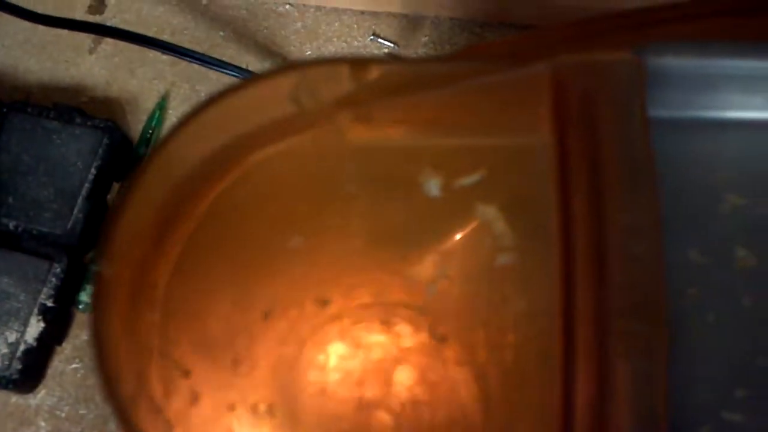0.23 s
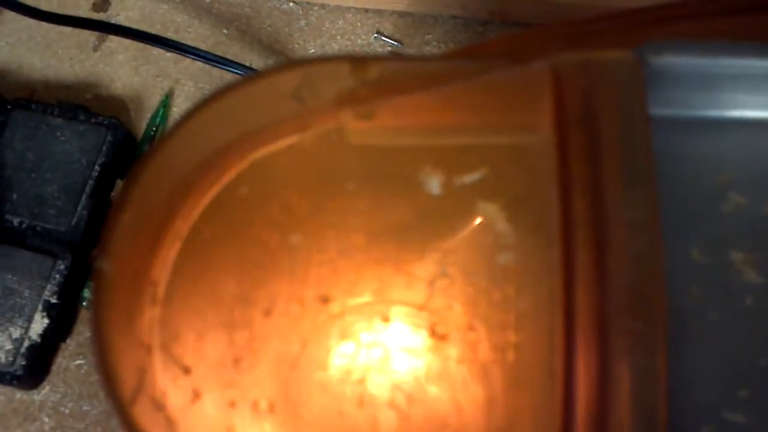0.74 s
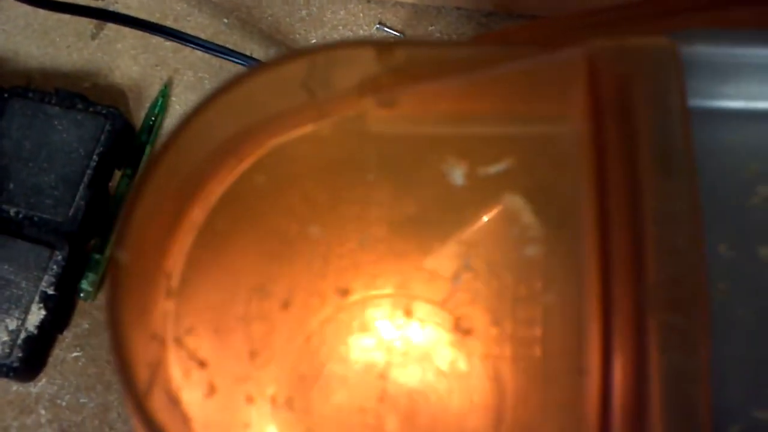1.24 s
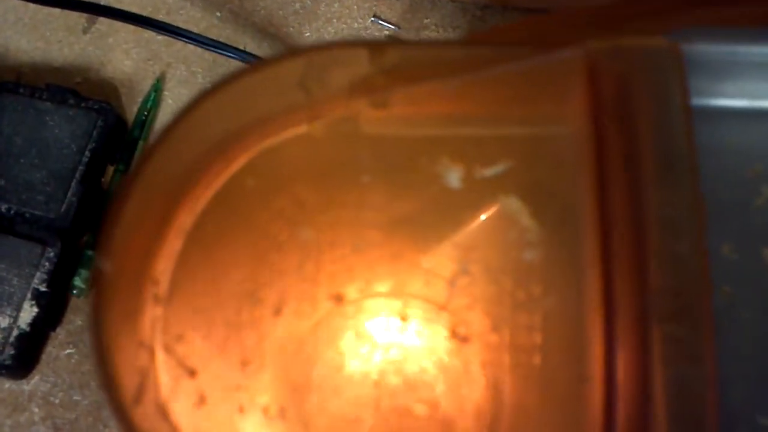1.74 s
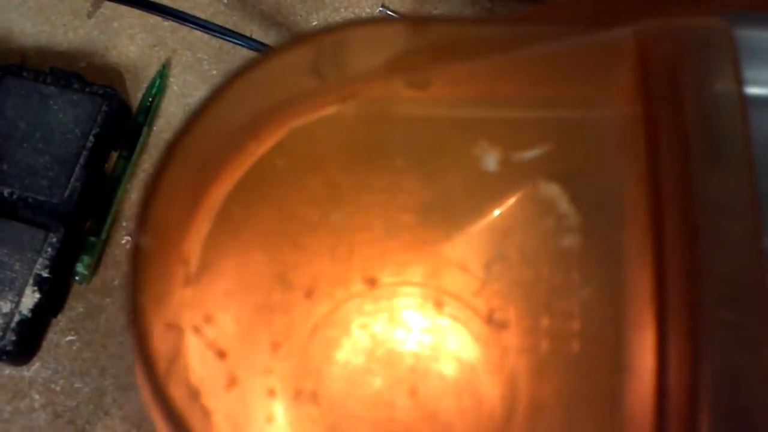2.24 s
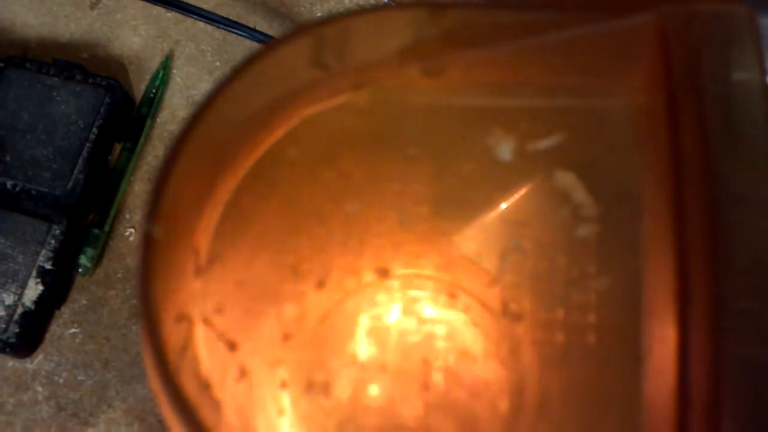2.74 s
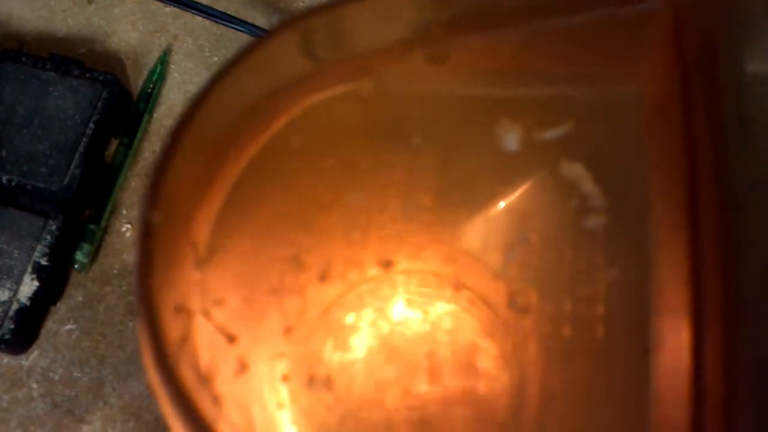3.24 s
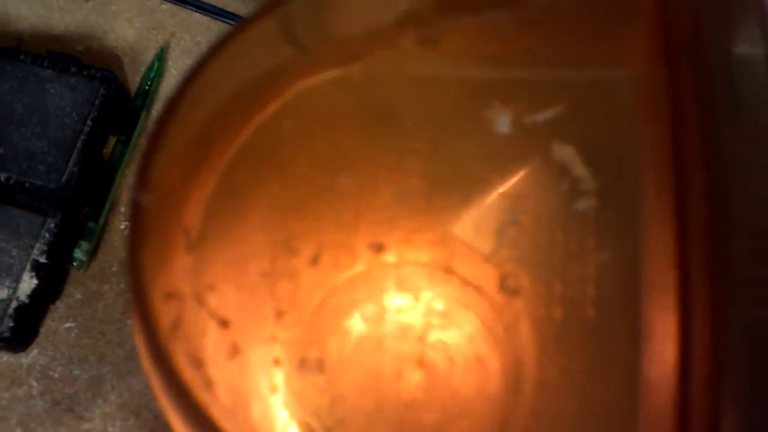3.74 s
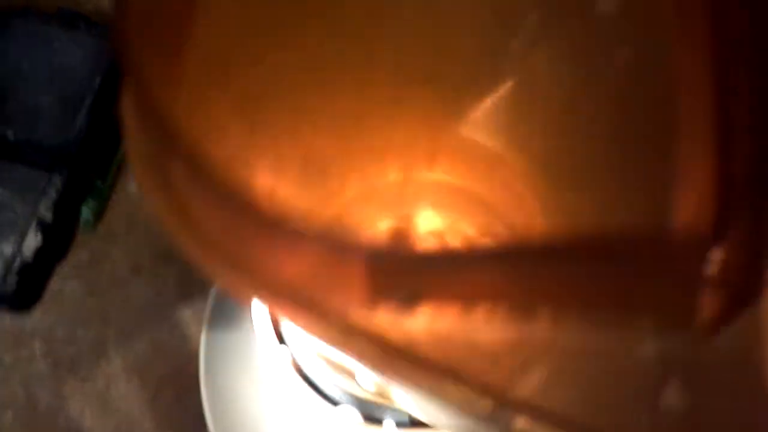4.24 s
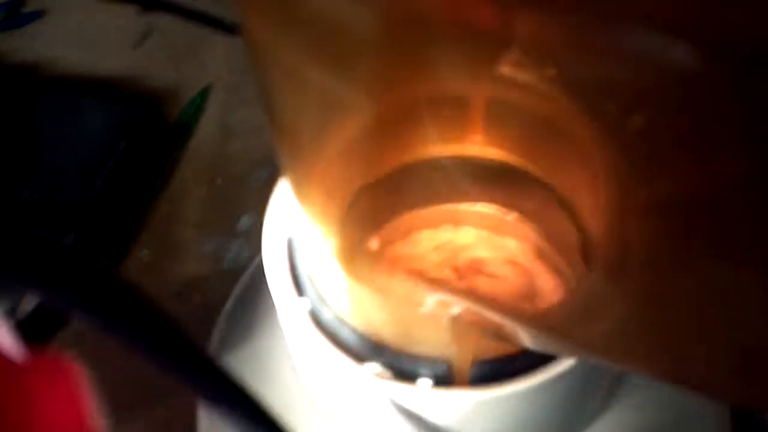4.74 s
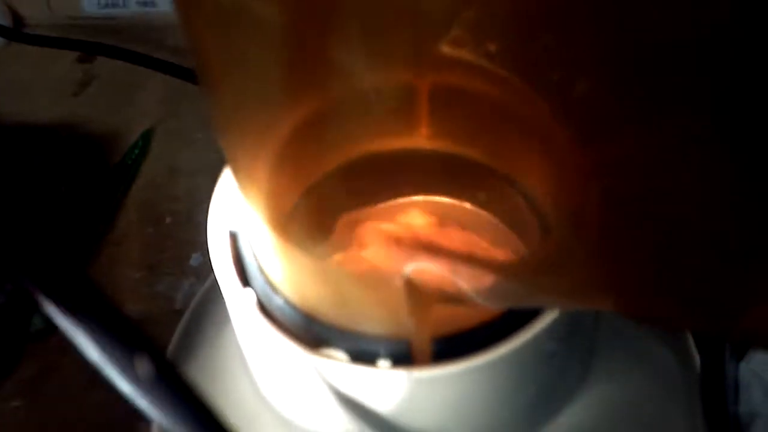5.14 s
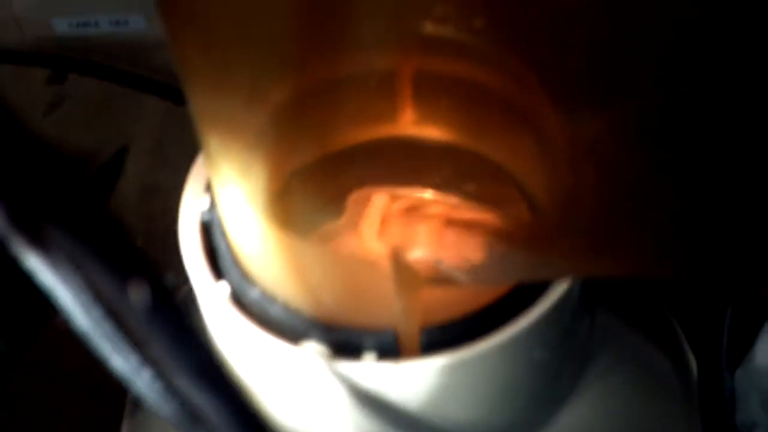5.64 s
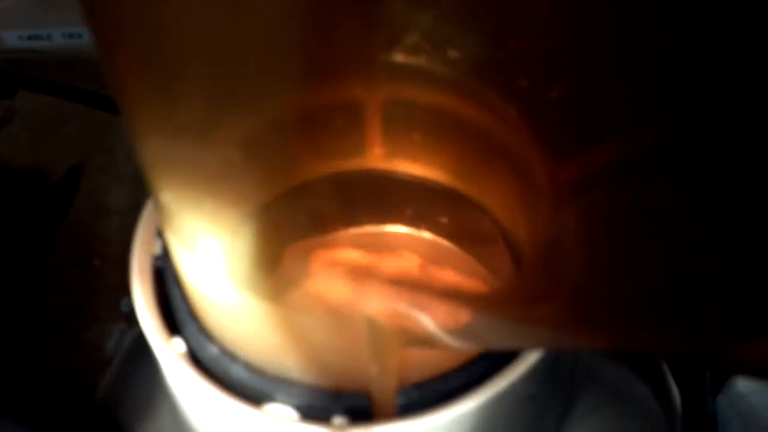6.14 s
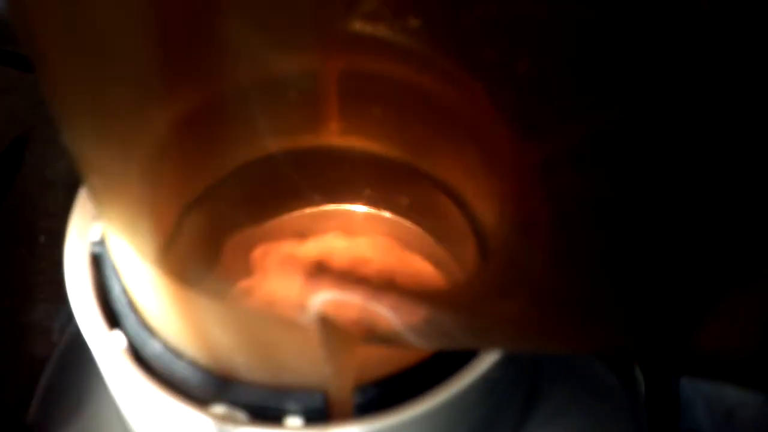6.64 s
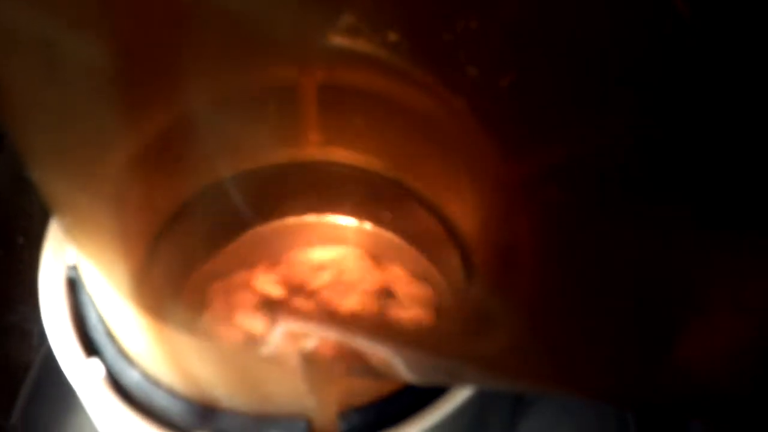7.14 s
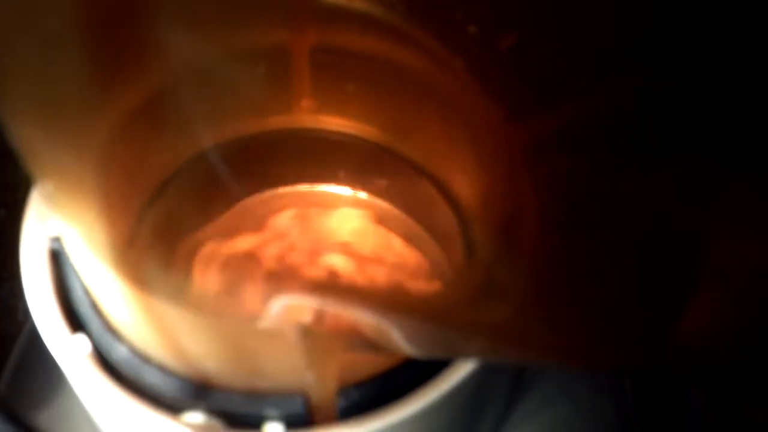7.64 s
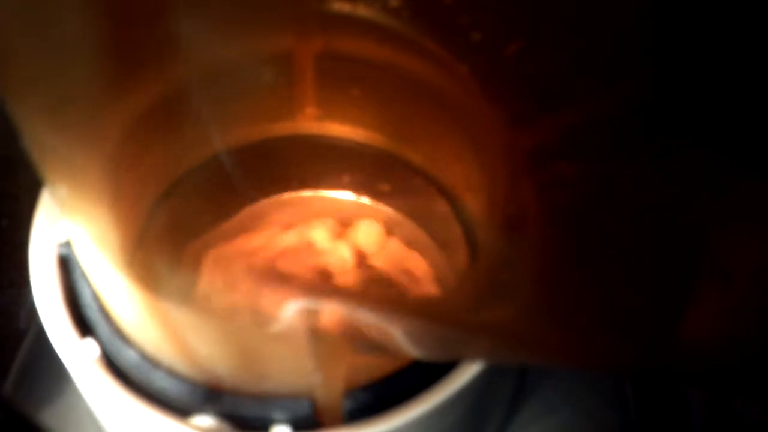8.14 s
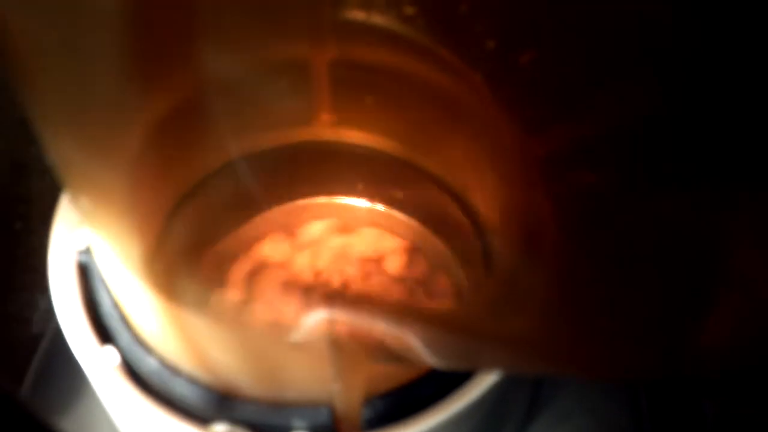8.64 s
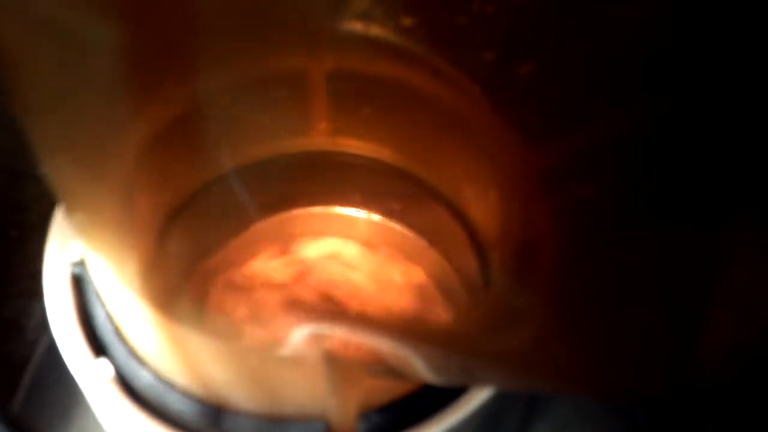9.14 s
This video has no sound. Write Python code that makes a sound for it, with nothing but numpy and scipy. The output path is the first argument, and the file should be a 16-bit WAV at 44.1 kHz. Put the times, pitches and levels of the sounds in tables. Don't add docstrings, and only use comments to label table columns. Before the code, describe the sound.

A hot-air popper roars steadily as coffee beans tumble and tick inside, its motor whining, with a strong low hum arriving as the listener moves to the spout.

```python
import sys
import numpy as np
from scipy import signal
from scipy.fft import rfft, irfft, next_fast_len
from scipy.io import wavfile
from scipy.ndimage import uniform_filter1d

SR = 44100
rng = np.random.default_rng(int(sys.argv[2]) if len(sys.argv) > 2 else 0)


def ratio(d):
    e = np.asarray(d, float) / 20
    return 10 ** e


def wav_record(signal):
    frames = np.transpose(np.atleast_2d(signal))
    bounded = np.clip(frames, -1, 1)
    quanta = np.round(bounded * 32767).astype(np.int16)
    wavfile.write(sys.argv[1], SR, quanta)


N = 414981
SIZE = next_fast_len(N)
HZ = np.arange(SIZE // 2 + 1) * SR / SIZE + 1
SECONDS = np.arange(N) / SR
COARSE = 64


def curve(table):
    s, *columns = np.transpose(table)
    return [np.interp(SECONDS, s, column) for column in columns]


def across(table):
    hz, *columns = np.transpose(table)
    return [np.interp(np.log(HZ), np.log(hz), column) for column in columns]


def bump(hz, width_hz):
    return np.exp(-.5 * ((HZ - hz) / width_hz) ** 2)


def fine(coarse):
    return np.interp(np.arange(N) / COARSE, np.arange(len(coarse)), coarse)


def walk(rate):
    k = max(int(SR / rate / COARSE), 1)
    knots = rng.standard_normal(N // COARSE // k + 3)
    steps = np.interp(np.arange(N // COARSE + 2), np.arange(len(knots)) * k, knots)
    return 1.26 * uniform_filter1d(steps, k)


def self_noise():
    level_db = -74
    rumble = signal.lfilter([1], [1, -.99], rng.standard_normal((2, N)))
    return rumble * ratio(level_db) / np.std(rumble)


def shade_db():
    # start_s, depth_db, clears_s
    shade = [
        (0, -1.5, 1.75),
        (4.45, -1.5, 0.95),
    ]
    total_db = np.zeros(N)
    for start_s, depth_db, clears_s in shade:
        t = SECONDS - start_s
        onset = np.clip(t / 0.11 + 1, 0, 1)
        total_db += depth_db * onset * np.exp(-(np.maximum(t, 0) / clears_s) ** 2)
    return total_db


def turbulence(tumble_db, flicker_db):
    spectrum = rfft(rng.standard_normal(SIZE))
    octave = np.clip(np.log2(HZ / 100), 0, 7.5)
    out = np.zeros(N)
    for centre in np.arange(0, 8, .5):
        share = np.clip(1 - np.abs(octave - centre) * 2, 0, 1)
        treble = np.clip((centre - 4.2) / 2.0, 0, 1)
        db = treble * tumble_db + flicker_db * (0.46 + treble) * walk(9)
        out += fine(ratio(db)) * irfft(spectrum * share, SIZE)[:N]
    return out


def beans(tumble_db):
    beans_per_s, level_db, scatter_db = 1500, -6, 6
    hits = rng.random(N) < beans_per_s / SR
    hardness = np.minimum(rng.exponential(size=N), 3.5)
    ticks = hits * ratio(scatter_db * hardness + fine(tumble_db)) * rng.choice([-1., 1.], N)
    shell = np.exp(-np.arange(128) / 22) * rng.standard_normal(128)
    highpass = signal.butter(2, 3200, "high", fs=SR, output="sos")
    ticks = signal.sosfilt(highpass, np.convolve(ticks, shell)[:N])
    return ratio(level_db) * ticks / np.std(ticks)


def rim_ring(noise):
    level_db, passes_s, hold_s = -53, 4.53, .23
    rise_db_per_s, fall_db_per_s = 105, 260
    t = SECONDS - passes_s
    db = level_db - rise_db_per_s * np.maximum(-t - hold_s, 0) - fall_db_per_s * np.maximum(t, 0)
    ring = irfft(noise * bump(1870, 70), SIZE)[:N]
    return ratio(db) * ring * np.array([[1], [-1]])


def roar(place, roar_db, hiss_db):
    # pitch_hz, above_db_per_hz, spout_db_per_hz
    chamber_air = [(60.4, -84, -81), (207, -57.5, -55), (308, -51.5, -49.5), (426, -45, -47.5),
                   (546.7, -38, -38.5), (602.5, -46, -51), (684, -55, -50.5), (790, -60.5, -49),
                   (1044, -61.5, -57), (1300, -64.5, -58), (1413, -60, -61.5), (1702, -51, -55.5),
                   (1909, -51, -65.5), (2124, -77.5, -69.5)]
    # pitch_hz, above_db_per_hz, spout_db_per_hz
    slot_jets = [(2500, -66, -73), (2800, -66, -69), (3200, -71, -65), (3600, -70, -69), (4300, -71, -69),
                 (5000, -75, -75), (6000, -68, -66), (7000, -71, -70), (8500, -74, -74), (10000, -76, -74),
                 (11700, -75, -72), (12600, -78, -77), (14000, -82, -80), (15600, -88, -84)]
    # pitch_hz, width_hz, above_db, spout_db
    hood_echoes = [(370, 22, 4, 3), (688, 25, 5.5, 1.5), (838, 31, 1, 2), (1070, 140, 1, -1.2),
                   (1460, 47, -3, 4), (1233, 23, 5, -3), (1360, 38, -3.5, 1), (1278, 31, 3, -4),
                   (1820, 78, -2, 3.5), (2010, 40, 5, 4), (2430, 45, 5, -3), (2760, 57, -5.5, -14),
                   (3085, 57, 0.5, -5), (3065, 100, -1.5, 5.5), (4100, 160, -0.5, -6), (4400, 160, 0, 5),
                   (5370, 210, -7, -7), (5880, 140, 1, 3), (7660, 190, -4, -0.5), (9230, 300, -3, -2),
                   (13000, 300, -6, -2.5)]
    # pitch_hz, side_minus_mid_db, phase_rad, likeness_0_to_1
    ports_above = [(30, -24, 1.5, .2), (90, -3, 2.5, .3), (200, -25, 2, .8), (400, -20.5, 2, 0.95),
                   (540, -16, 2, 1), (800, -10.5, 2.5, 0.8), (1100, 0, 2, .7), (1500, 0, 5.5, .6),
                   (1700, -5.5, 2, 1), (2050, 6, 3, 0.9), (2500, 13.5, 1.6, .3), (2940, -0.7, -0.5, .4),
                   (5200, -0.6, -0.5, 0.6), (16000, -0.5, 1.5, .5)]
    # pitch_hz, side_minus_mid_db, phase_rad, likeness_0_to_1
    ports_spout = [(30, -24, -4, .2), (90, -6, 2.5, .3), (300, -17, 2, .4), (470, -8, 2.04, 0.89),
                   (600, -12, 2.5, 0.93), (750, -17, 5, .8), (1000, -3.5, 4, 0.87), (1500, -1, 1.5, 0.96),
                   (1700, 2, 3, 0.81), (1900, 5, 2, .5), (2440, 8.5, 3, .3), (2930, 1.8, 0, 0.54),
                   (5200, 0.9, 0, 0.66), (16000, 0, -1, .5)]
    tumble_db = 1.08 * walk(4.1) + 0.85 * walk(20)
    near = rfft(turbulence(tumble_db, 0.46) + beans(tumble_db), SIZE) * np.sqrt(SR / 2)
    other = rfft(turbulence(tumble_db, 0.69) + beans(tumble_db), SIZE) * np.sqrt(SR / 2)
    low = np.clip((2500 - HZ) / 300, 0, 1)
    out = rim_ring(near)
    for k, (ports, share) in enumerate(zip((ports_above, ports_spout), (1 - place, place))):
        side_db, phase, like = across(ports)
        like = np.clip(like, 0, 1)
        echo_db = sum(row[2 + k] * bump(*row[:2]) for row in hood_echoes)
        colour_db = across(chamber_air + slot_jets)[k] + echo_db
        side = ratio(side_db) * (like * np.exp(1j * phase) * near + np.sqrt(1 - like ** 2) * other)
        pair = np.array([near, side]) * ratio(colour_db - side_db * (1 - low))
        body = irfft(pair * low, SIZE)[:, :N]
        jets = irfft(pair * (1 - low), SIZE)[:, :N]
        out = out + share * (body * ratio(roar_db) + jets * ratio(hiss_db))
    return out


def whine_levels():
    # shaft_order, above_db, spout_db
    usual_lines = [(9, -58, -57), (18, -54, -55), (22, -68, -63), (25, -68, -64), (29, -54, -53),
                   (52, -54, -52), (56, -62, -61), (62, -56, -57), (68, -61, -58)]
    # shaft_order, above_db, spout_db
    singers = [(9, -48, -51), (14, -49, -48), (16, -53, -50), (17, -51, -61), (18, -45, -48),
               (19, -46, -44), (26, -57, -52), (30, -52, -54), (32, -55, -48), (34, -44, -46),
               (35, -48, -48), (37, -55, -49), (38, -45, -55), (39, -51, -48), (41, -51, -42),
               (44, -58, -47), (46, -53, -47), (50, -49, -50), (52, -50, -52)]
    scatter_db = 2
    order, *usual = np.transpose(usual_lines)
    orders = np.arange(order[0], order[-1] + 1)
    rows = np.transpose([np.interp(orders, order, u) for u in usual])
    rows = rows + scatter_db * rng.standard_normal((len(orders), 2))
    for k, *db in singers:
        rows[round(k - order[0])] = db
    return round(order[0]), rows


def whine(place, turn):
    coarse_place = np.append(place[::COARSE], [1, 1])[:N // COARSE + 2]
    shaded_db = np.append(shade_db()[::COARSE], [0, 0])[:len(coarse_place)]
    first, levels = whine_levels()
    order, out = turn ** (first - 1), np.zeros(N)
    for above_db, spout_db in levels:
        order *= turn * np.exp(2j * np.pi * rng.random())
        waver_db = 1.75 * walk(1.58) + 0.8 * walk(12)
        db = -0.73 + shaded_db + above_db + coarse_place * (spout_db - above_db) + waver_db
        out += np.sqrt(2) * order.real * fine(ratio(db))
    return out


def shaft_tones(place, turn, tug, hum_db, blade_db):
    # shaft_order, level_db, side_minus_mid_db, side_phase_rad, unsteady_db
    tones_above = [(1, -38.5, -0.5, -1.2, .5), (2, -28.5, -14, 1, 2.5), (3, -31.5, -19, 3, 4),
                   (4, -48, -20, 2.4, -3.5), (5, -29, 1, 4, 0.4), (6, -59, -8, 2.4, 2.5),
                   (7, -32, -6, 1.5, 2), (8, -39, 12, 2, -2.5)]
    # shaft_order, level_db, side_minus_mid_db, side_phase_rad
    tones_spout = [(1, -20, -9.5, -0.04), (2, -32, -6.5, 2), (3, -35, -10, 4.5), (4, -60, -2, -1),
                   (5, -23, -10, 2), (6, -37, -2, 2.1), (7, -34.5, 5.5, 2.5), (8, -43, -9, -4)]
    mains = 1 + 0.24 * (0.43 * tug + 0.37 / tug)
    heard_db = {1: hum_db, 5: blade_db}
    out, order = np.zeros((2, N)), np.ones(N, complex)
    for above, spout in zip(tones_above, tones_spout):
        k = round(above[0])
        order = order * turn * np.exp(2j * np.pi * rng.random())
        db, side_db, phase = (a + place * (b - a) for a, b in zip(above[1:4], spout[1:]))
        buffet = above[4] * (walk(22) + .12j * walk(22))
        tone = order * ratio(db + heard_db.get(k, 0))
        tone = tone * fine(ratio(buffet.real)) * np.exp(1j * fine(buffet.imag))
        if k == 5:
            tone = tone * mains
        side = tone * ratio(side_db) * np.exp(1j * phase)
        out += np.sqrt(2) * np.array([tone.real, side.real])
    return out


def motor(place, shaft_hz, hum_db, blade_db):
    mains_hz, mains_db = 120.5, -54
    wobble = 1 + 0.0001975 * fine(walk(6))
    turn = np.exp(2j * np.pi * np.cumsum(shaft_hz * wobble) / SR)
    tug = np.exp(2j * np.pi * mains_hz * SECONDS)
    out = ratio(mains_db) * tug.real * np.array([[1], [.15]])
    out += shaft_tones(place, turn, tug, hum_db, blade_db)
    return out + whine(place, turn)


def scene():
    # time_s, level_change_db
    lean = [(0, 0), (.25, 1), (.8, 1), (2.1, -0.5), (3, 0), (3.5, -1.5), (3.85, 0), (4.37, -4.5), (4.8, -1),
            (5.6, -0.5), (5.95, 0.5), (6.6, 0.5), (6.75, -2), (7.1, -0.5), (8.3, -0.5), (9.41, -1)]
    # time_s, place (0 above the hood, 1 at the spout)
    move = [(0, 0.043), (4.1, 0.028), (4.3, 0.36), (4.5, 0.69), (4.7, 0.91), (5, 0.93), (5.6, 1),
            (9.41, 0.96)]
    # time_s, shaft_hz
    shaft = [(0, 230.75), (.6, 230.76), (1, 230.84), (1.8, 230.59), (2.6, 230.53), (3.3, 230.26),
             (3.9, 230.27), (4.6, 230.15), (5.4, 230.41), (5.9, 230.44), (6.6, 230.63), (7.3, 230.38),
             (7.8, 230.42), (8.2, 230.56), (9.41, 230.54)]
    roar_lean, hiss_lean, blade_lean = 0.1, 0.065, 1.7
    hum_swell_db_per_s, hiss_swell_db_per_s, settled_s = 1, .1, 6.8
    lean_db = curve(lean)[0]
    place = np.clip(curve(move)[0], 0, 1)
    creep_s = place * (SECONDS - settled_s)
    hiss_db = hiss_lean * lean_db + hiss_swell_db_per_s * creep_s + shade_db()
    air = roar(place, roar_lean * lean_db, hiss_db)
    return air + motor(place, curve(shaft)[0], hum_swell_db_per_s * creep_s, blade_lean * lean_db)


def roll_off(x):
    return signal.sosfilt(signal.butter(12, 15750, fs=SR, output="sos"), x)


def record(dry):
    port_lag, mid_top_hz = 17, 15100
    late = np.pad(dry, ((0, 0), (port_lag, 0)))[:, :N]
    mid = (dry[0] - late[0]) / 2
    side = (dry[1] + late[1]) / 2
    mid = irfft(rfft(mid, SIZE) * (HZ < mid_top_hz), SIZE)[:N]
    return roll_off(np.array([mid + side, mid - side]) + self_noise())


dry = scene()
out = record(dry)
wav_record(out)
```